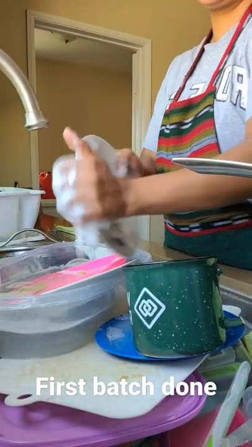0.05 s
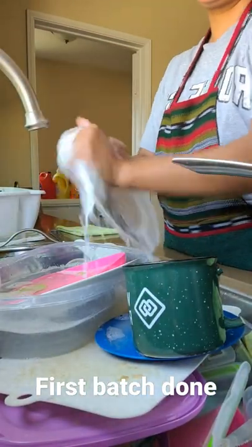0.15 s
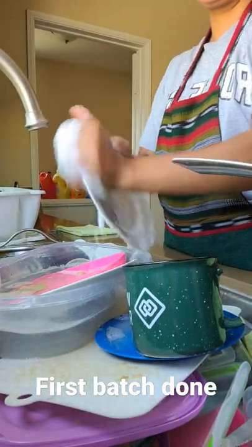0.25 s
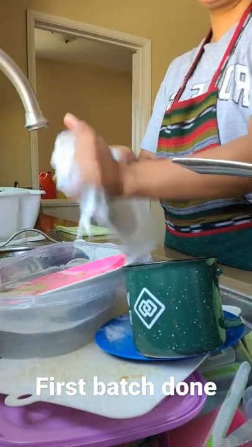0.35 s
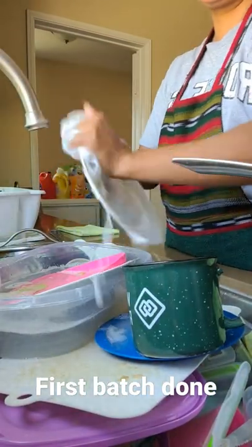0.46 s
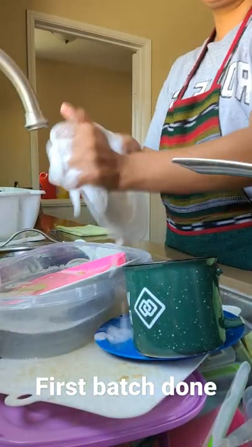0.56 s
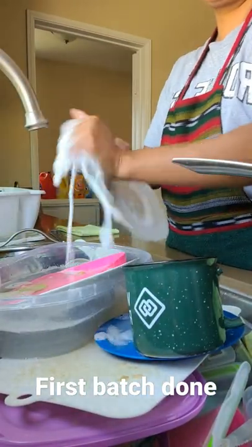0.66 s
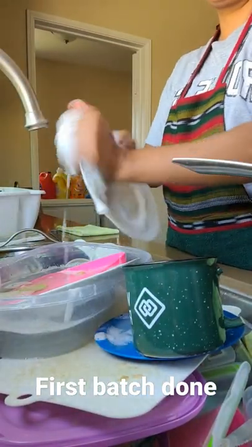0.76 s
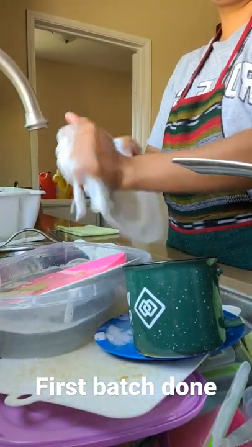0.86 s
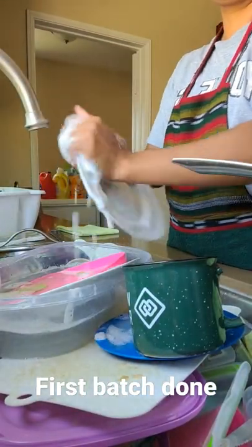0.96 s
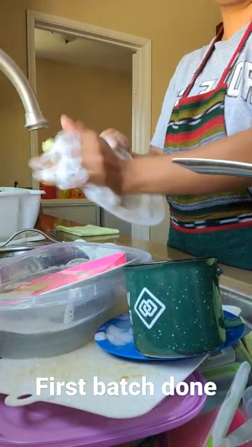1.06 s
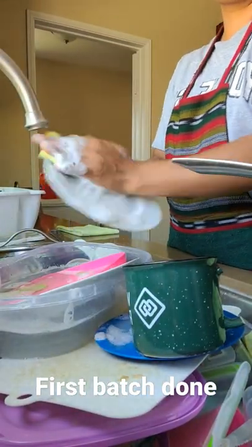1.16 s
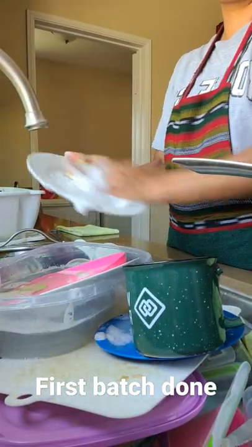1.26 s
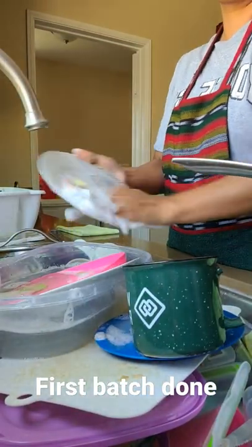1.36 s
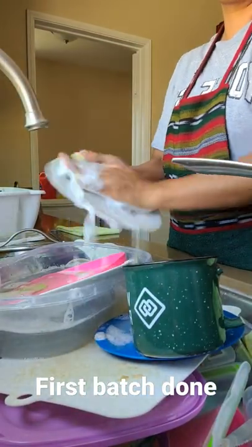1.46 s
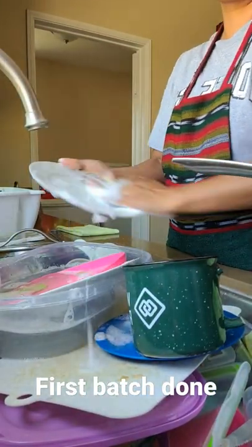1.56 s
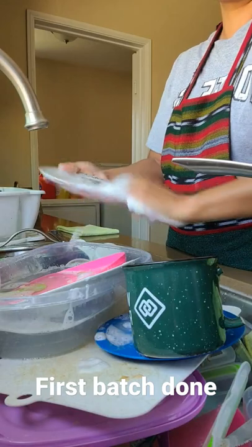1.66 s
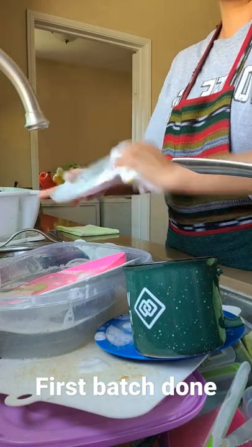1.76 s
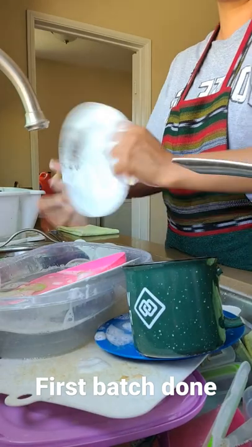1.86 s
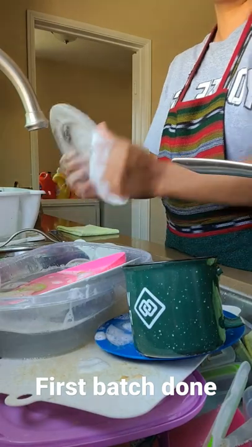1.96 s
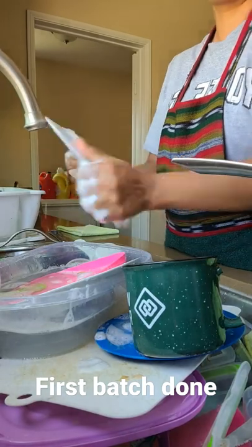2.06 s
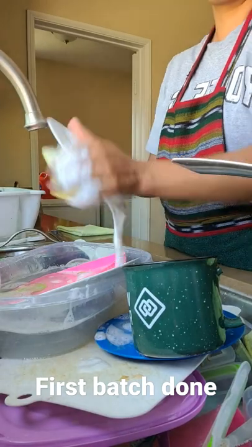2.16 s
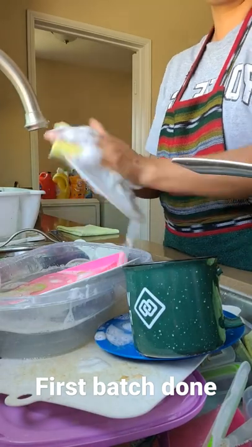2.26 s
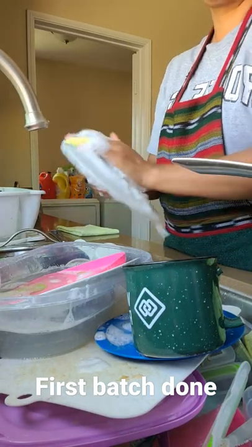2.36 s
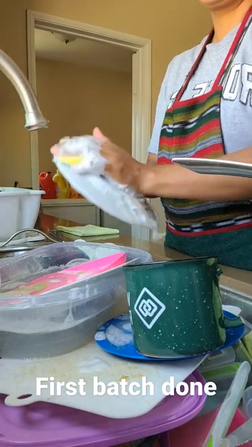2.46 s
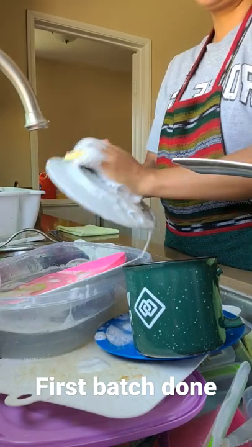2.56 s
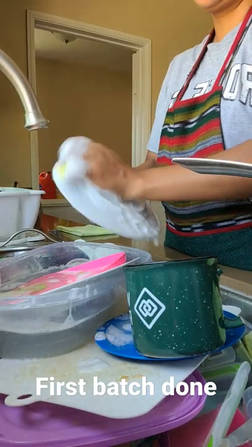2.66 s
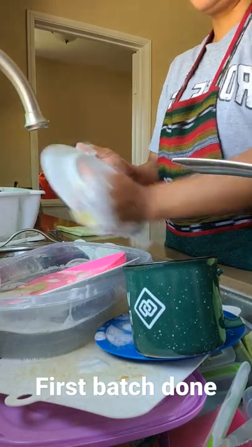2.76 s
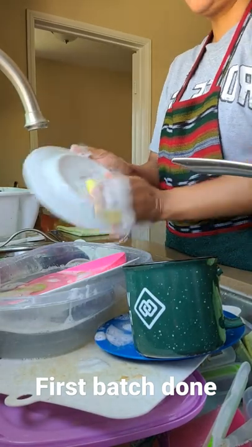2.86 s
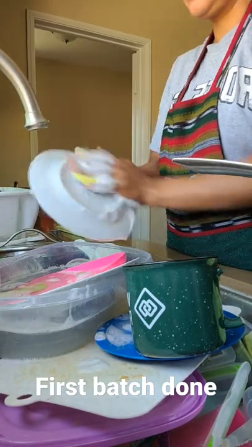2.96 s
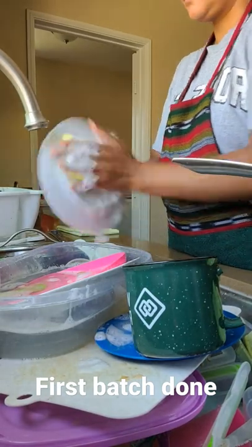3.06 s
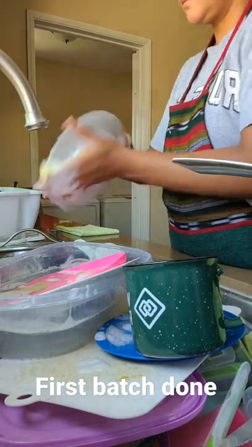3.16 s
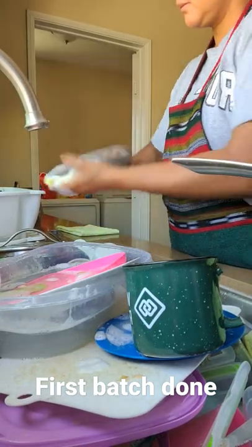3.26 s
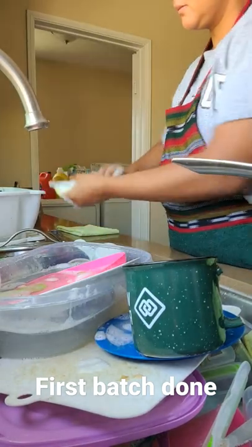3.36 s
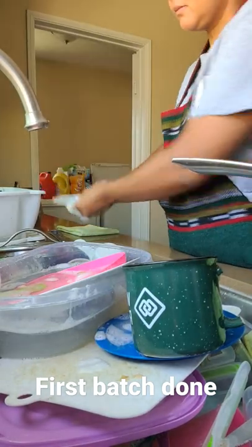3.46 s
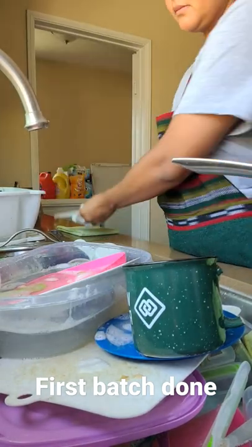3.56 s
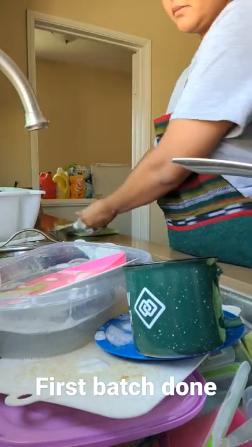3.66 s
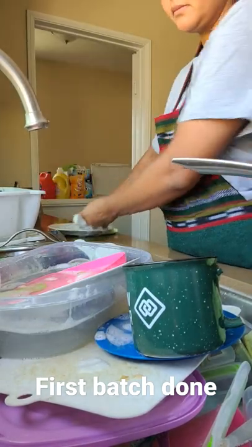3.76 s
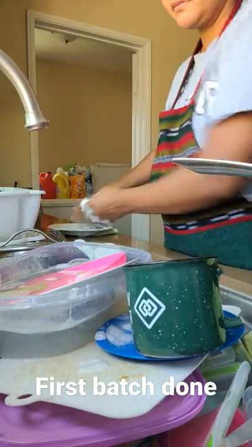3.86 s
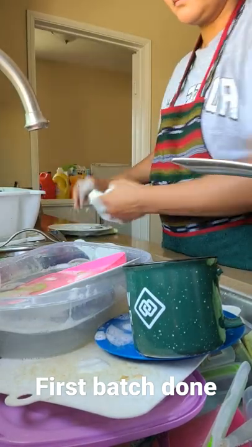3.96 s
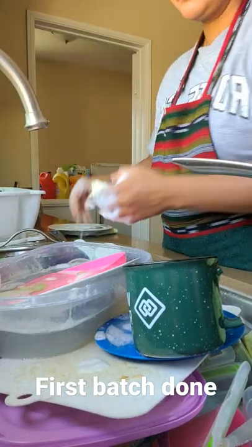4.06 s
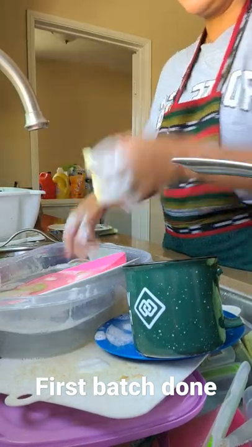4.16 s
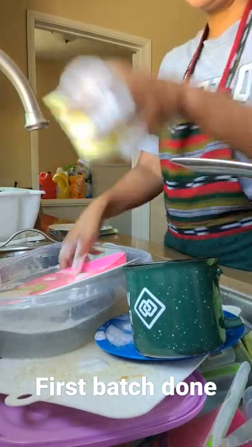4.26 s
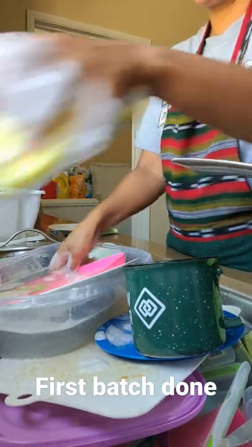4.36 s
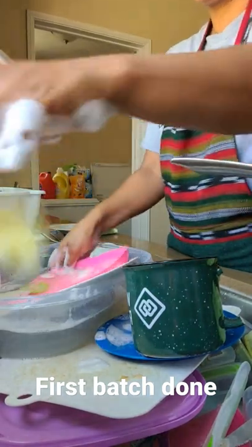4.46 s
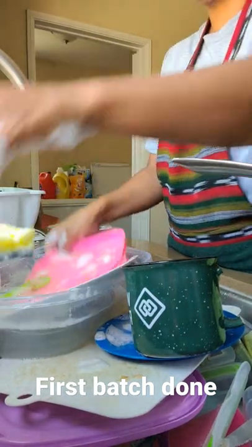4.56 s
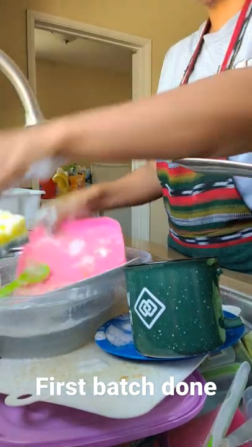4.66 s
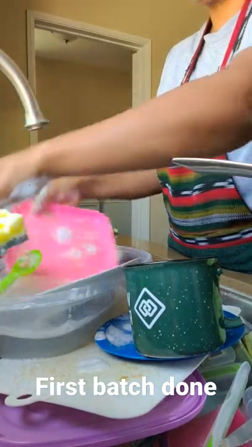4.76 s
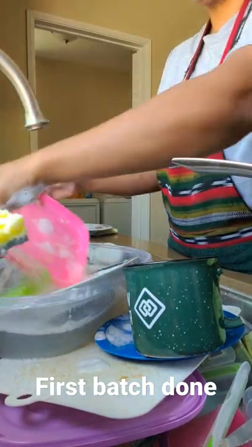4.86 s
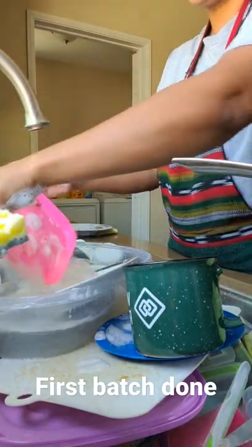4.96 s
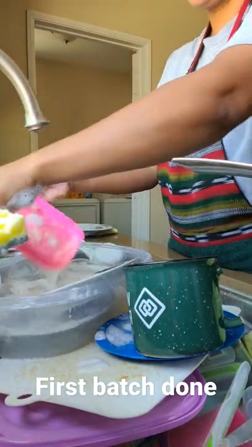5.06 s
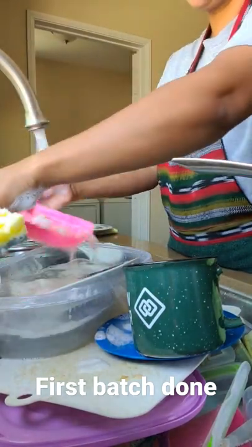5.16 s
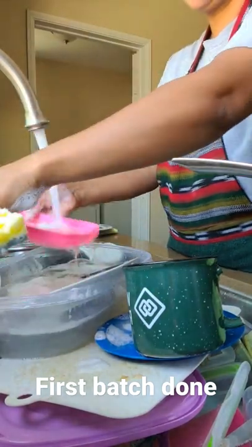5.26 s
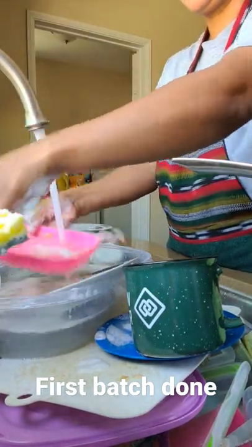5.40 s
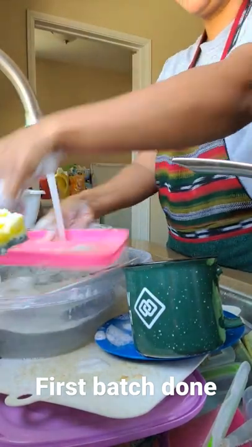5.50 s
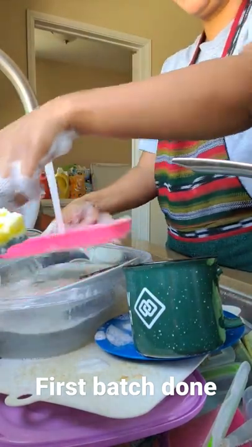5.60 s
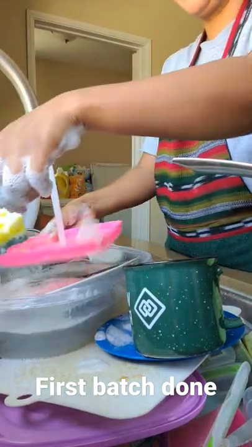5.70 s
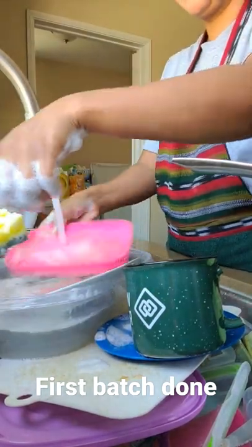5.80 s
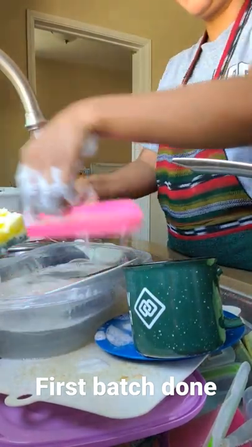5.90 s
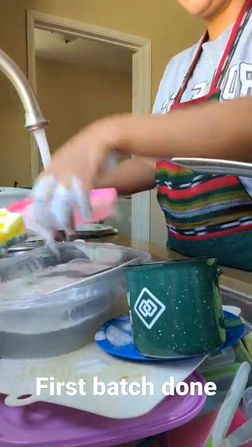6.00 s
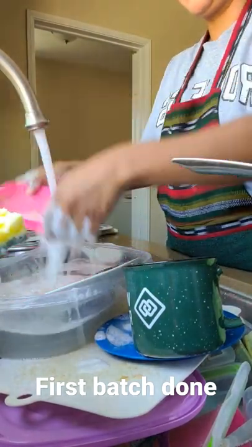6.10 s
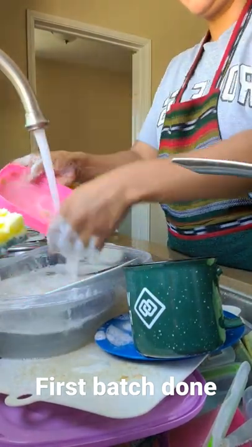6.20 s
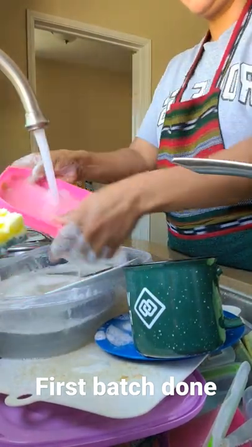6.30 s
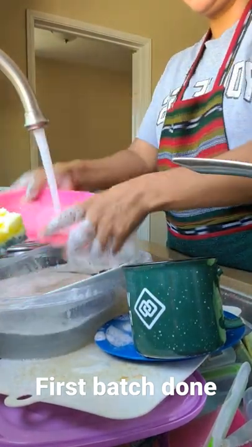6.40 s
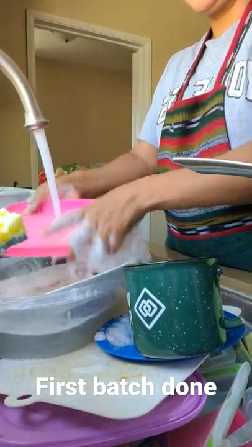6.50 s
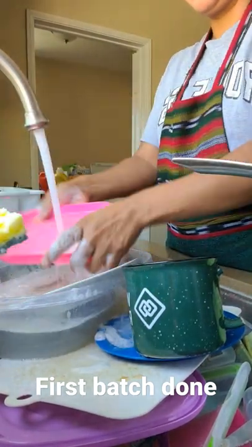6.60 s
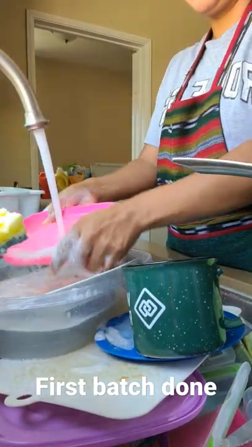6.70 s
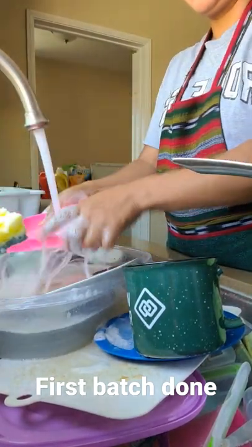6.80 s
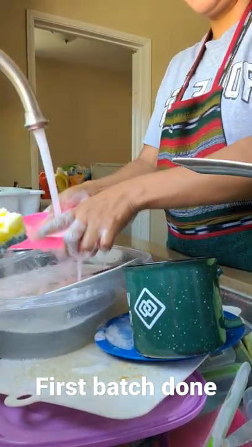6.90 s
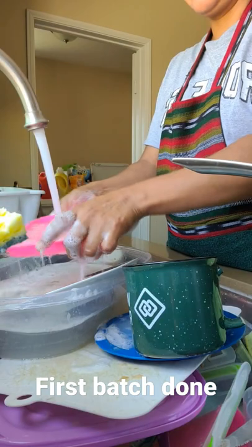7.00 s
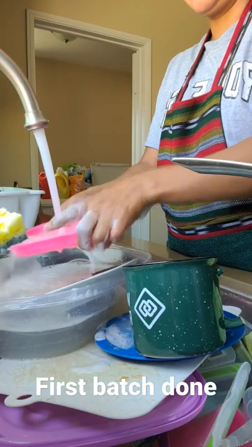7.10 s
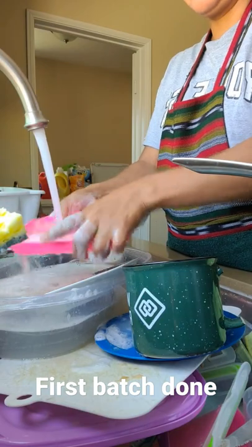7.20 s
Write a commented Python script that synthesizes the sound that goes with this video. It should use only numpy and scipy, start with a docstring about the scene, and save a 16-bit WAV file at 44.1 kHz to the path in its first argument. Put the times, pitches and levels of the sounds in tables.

```python
"""A soapy plate is scrubbed over a mains hum and a low drone, in a small, hard-walled kitchen. The plate squeaks,
knocks against an enamel pot and the spout, and is set down on the counter. A plastic tray is fished out of
a clattering tub of water and rinsed under the tap. Each knock is a burst of noise plus ringing tones;
suds and bubbles are built from random clicks, the tap from filtered noise, and the hum from wavering sines."""
import sys
import numpy as np
from scipy import signal
from scipy.fft import rfft, irfft, next_fast_len
from scipy.io import wavfile

SR = 44100
rng = np.random.default_rng(int(sys.argv[2]) if len(sys.argv) > 2 else 0)


def inscribe(sig):
    """Save sig as 16-bit PCM at rate SR to the path in sys.argv[1].

    A 1-D sig is mono; a 2-D sig holds one channel per row.
    Samples are clipped to [-1, 1] before scaling.
    """
    pcm = np.round(np.clip(np.atleast_2d(sig).T, -1, 1) * 32767)
    wavfile.write(sys.argv[1], SR, pcm.astype(np.int16))


N = 319284
TIME = np.arange(N) / SR   # seconds
BLOW_TIME = TIME[:SR * 3 // 4]   # seconds since one knock

# How alike the left and right sides are. Each row: pitch in Hz, correlation (1 is identical, 0 unrelated).
LEFT_RIGHT_LIKENESS = [(100, 0.92), (350, 1), (520, 0.1), (750, -0.37), (1400, 0.0076), (4000, 0.022)]


def from_db(db):
    """Turn decibels into a gain."""
    return 10 ** (np.asarray(db) / 20)


def rms_one(x):
    """Scale a sound so that its average strength (rms) is 1."""
    return x / np.sqrt(np.mean(x ** 2) + 1e-20)


def opening_one(x):
    """Scale a sound so that its first fiftieth of a second has rms 1."""
    return x / np.sqrt(np.mean(x[:, :SR // 50] ** 2))


def at_hz(points, hz):
    """Read a table between its rows, with pitch on a logarithmic scale."""
    table_hz, value = np.transpose(points)
    return np.interp(np.log(hz + 1), np.log(table_hz), value)


def drift(rate, size=N):
    """Smooth random wandering with spread 1, mostly slower than `rate` in Hz."""
    padded = next_fast_len(size)
    hz = np.fft.rfftfreq(padded, 1 / SR)
    noise = rfft(rng.standard_normal(padded))
    return rms_one(irfft(noise / (1 + (hz / rate) ** 4), padded)[:size])


def colour(x, spectrum):
    """Filter a sound to follow a spectrum and fall away below it, without sounding ahead of time."""
    size = 8192
    hz = np.fft.rfftfreq(size, 1 / SR)
    gain = from_db(at_hz(spectrum, hz)) / (1 + (spectrum[0][0] / (2 * hz + 1)) ** 2)
    # folding the cepstrum gives a minimum-phase filter: its response starts at once
    cepstrum = irfft(np.log(gain))
    cepstrum[1:size // 2] *= 2
    cepstrum[size // 2 + 1:] = 0
    response = irfft(np.exp(rfft(cepstrum)))
    return signal.fftconvolve(x, response[None], axes=-1)[:, :x.shape[-1]]


def resonate(x, hz, width):
    """One resonance, `width` Hz wide, with gain 1 on top."""
    r = np.exp(-np.pi * width / SR)
    feed = np.array([1, 0, -1]) * (1 - r * r) / 2
    feedback = [1, -2 * r * np.cos(2 * np.pi * hz / SR), r * r]
    return signal.lfilter(feed, feedback, x + 1e-18)


def diffuse(size):
    """White noise arriving from all sides: alike at both ears in the bass, nearly unrelated in the treble."""
    padded = next_fast_len(size)
    mid, side = rfft(rng.standard_normal((2, padded)))
    alike = np.clip(at_hz(LEFT_RIGHT_LIKENESS, np.fft.rfftfreq(padded, 1 / SR)), -.99, .99)
    both = np.sqrt(1 + alike) * mid + np.sqrt(1 - alike) * side * [[1], [-1]]
    return rms_one(irfft(both, padded)[:, :size])


def echoing_click(t60, direct_db, late_db=-29.0, late_t60=0.53, build_s=0.00028):
    """One click, then reflections from sink and walls crowd in and die away, with a faint long tail."""
    # t60 is the time in seconds to fade by 60 dB
    early = from_db(-60 * BLOW_TIME / t60)
    late = from_db(late_db - 60 * BLOW_TIME / late_t60)
    out = diffuse(len(BLOW_TIME)) * (early + late) * (1 - np.exp(-BLOW_TIME / build_s))
    out[[0, 1], [6, 0]] += from_db(direct_db)   # the click itself: left side 6 samples after the right
    return out


def kitchen(x, t60=0.25, direct_db=20.0):
    """Let a small source be heard through the echoes of the room; rms 1."""
    return rms_one(signal.fftconvolve(x[None], echoing_click(t60, direct_db), axes=-1)[:, :N])


def add(out, s, sound):
    """Mix a sound in at time s in seconds."""
    start = int(s * SR)
    out[:, start:start + sound.shape[1]] += sound[:, :N - start]


def grains(per_s, spread_db):
    """Clicks at random moments, a few much bigger than the rest."""
    sizes = from_db(spread_db * np.minimum(rng.exponential(1, N), 5))
    return sizes * rng.choice([-1, 1], N) * (rng.random(N) < per_s / SR)


def swell(s, length):
    """One movement: builds to 1 at time s and eases off again."""
    rise_share = 0.48   # part of the length spent swelling
    side_length = length * np.where(TIME < s, rise_share, 1 - rise_share)
    reach = np.abs(TIME - s) / side_length
    return np.exp(-np.minimum(reach, 10) ** 2)


def effort(movements, rest_db):
    """Gain of a run of strokes or splashes; their powers add over a resting level."""
    power = from_db(rest_db) ** 2
    for s, length, db in movements:
        power = power + (from_db(db) * swell(s, length)) ** 2
    return np.sqrt(power)


def room(drone_db=-45.5, air_db=-69.0, usual_db=1.5, swing=0.83):
    """A motor's wavering mains hum over a low drone of moving air, with a faint steady hiss."""
    # Ups and downs of hum and drone; only differences from the average count.
    # Each row: time in seconds, level in dB.
    background = [(0.0, -39), (1.11, -44.5), (1.91, -38.5), (2.54, -47), (4.72, -42), (5.36, -37.5),
                  (6.92, -41), (7.24, -39)]
    # Colour of the drone. Each row: pitch in Hz, relative strength in dB.
    drone_spectrum = [(12, -41), (20, -6), (65, -7.5), (90, -11), (103, -16), (123, -12.5), (147, -9.5),
                      (188, -13.5), (318, -17), (357, -5), (511, -20.5), (546, -14.5), (664, -24),
                      (1000, -28), (1300, -29.5), (2200, -120)]
    # Tones of the hum. Each row: pitch in Hz, level in dB before the ups and downs, waver from 0 to 1.
    hum_tones = [(120.1, -47, 0.06), (355.4, -53.5, 0.86)]
    level_db = np.interp(TIME, *np.transpose(background))
    hum = 0
    for hz, db, waver in hum_tones:
        strength = 1 + waver * drift(13)
        tone = strength * np.sin(2 * np.pi * hz * TIME + waver * drift(15.5))
        hum = hum + from_db(db) * rms_one(tone)
    drone = from_db(drone_db) * rms_one(colour(diffuse(N), drone_spectrum))
    ups_and_downs = from_db(usual_db + swing * (level_db - level_db.mean()))
    return ups_and_downs * (hum + drone) + from_db(air_db) * diffuse(N)


def taps(direct_db=18.0):
    """Light touches of fingers and plastic and plops of water and suds, each with one damped resonance."""
    # Each row: start in seconds, level in dB, centre pitch in Hz, sharpness Q, fade time t60 in seconds.
    touches = [(0.097, -43, 1660, 3.5, 0.074), (0.567, -45.5, 1980, 5.2, 0.046), (1.036, -29, 850, 6, 0.12),
               (1.036, -37, 3300, 1.3, 0.15), (1.459, -47, 2060, 5.6, 0.073),
               (1.515, -49, 2600, 0.44, 0.061), (1.94, -46, 5000, 0.34, 0.11), (2.28, -48, 1680, 1.3, .12),
               (2.5705, -43, 2180, 0.4, 0.026), (3.066, -42.5, 1800, .8, 0.11),
               (4.106, -43, 330, 2.1, 0.083), (4.456, -36, 525, 1.2, 0.14), (4.835, -44, 700, 0.24, 0.11),
               (4.887, -35, 335, 4.2, 0.13), (4.898, -44, 490, 10, 0.091),
               (4.9485, -41.5, 5950, 0.67, 0.17), (4.996, -38.5, 360, 2.8, 0.15),
               (6.905, -38.5, 667, 15, 0.054)]
    out = np.zeros((2, N))
    for s, level_db, hz, q, t60 in touches:
        ringing = resonate(echoing_click(t60, direct_db), hz, hz / q)
        body = resonate(ringing, hz, 2 * hz)
        add(out, s, from_db(level_db) * opening_one(body))
    return out


def slosh(pressure, flow, low_hz=1100, high_hz=3500, q=5.7):
    """Bubbles of many sizes ring briefly in the tub, stirred by splashes, the sponge's run-off and the jet."""
    # Splashes into the tub. Each row: fullest moment in seconds, length in seconds, bubble level in dB.
    splashes = [(0.04, 0.11, -44.5), (4.46, 0.1, -49), (4.7, 0.11, -47), (5.03, 0.12, -42.5),
                (5.54, 0.15, -40), (6.16, .08, -41)]
    splashing = effort(splashes, rest_db=-58.5)   # at rest: the tub left alone
    run_off = from_db(-11.5) * pressure   # water squeezed from the sponge
    jet = from_db(-16) * flow
    stir = np.sqrt(splashing ** 2 + run_off ** 2 + jet ** 2)
    rings = 0
    for hz in np.geomspace(low_hz, high_hz, 20):
        bubbles = resonate(grains(per_s=40, spread_db=3.5), hz, hz / q)
        rings = rings + bubbles / np.sqrt(hz)
    return stir * kitchen(rings)


def tap_flow():
    """Gain of the jet: the valve opens quickly, then the first surge settles to a steady stream."""
    half_open_s, opening_s = 5.143, 0.014
    steady_db, surge_db, surge_s = -31.0, 1.6, 0.6
    since = TIME - half_open_s
    valve = (1 + np.tanh(since / (2 * opening_s))) / 2
    return valve * from_db(steady_db + surge_db * np.exp(-(since / surge_s) ** 2))


def running_tap(flow, spray_db=1.5, drops_db=-2.5, flutter_db=0.4):
    """The aerated jet hisses, spatters on the tray and drums the basin's resonances."""
    # Colour of the spray. Each row: pitch in Hz, relative strength in dB.
    spray_spectrum = [(530, -19), (900, -29), (1160, -24), (1550, -6), (1790, -10), (2020, -14),
                      (2570, -13), (3300, 0.5), (4150, -9), (5610, -0.5), (8980, -2), (10500, 3),
                      (13500, -4), (14900, 1), (16000, -7.5)]
    # Basin resonances drummed by the jet. Each row: pitch in Hz, width in Hz, level in dB relative to the jet's gain.
    basin_modes = [(184, 14, -22), (350.4, 74, -11.5), (457, 7.2, -24.5), (607, 42, -24), (820, 390, -26.5),
                   (1398, 52, -24.5), (1565, 90, -24), (1960, 360, -13.5), (2750, 19, -22),
                   (3810, 200, -14.5), (10500, 2700, -17.5)]
    flutter = from_db(flutter_db * drift(19))
    drops = kitchen(grains(per_s=5000, spread_db=6.5))
    spray = rms_one(colour(diffuse(N) + from_db(drops_db) * drops, spray_spectrum))
    jet = diffuse(N)
    basin = sum(from_db(db) * rms_one(resonate(jet, hz, width)) for hz, width, db in basin_modes)
    return flow * flutter * (from_db(spray_db) * spray + basin)


def squeak(jitter=0.033):
    """A finger sticks and slips on the wet plate, giving a jittery tone that rises with the press."""
    # Each row: multiple of the slip rate, relative level in dB.
    partials = [(2, -1), (3, -7.5)]
    slip_hz, slip_rise_hz = 523, 37.3
    press = swell(s=0.2, length=0.169)
    rate = (slip_hz + slip_rise_hz * press) * (1 + jitter * drift(80))
    phase = 2 * np.pi * np.cumsum(rate) / SR
    tone = sum(from_db(db) * np.sin(round(k) * phase) for k, db in partials)
    return from_db(-43) * press * kitchen(tone)


def scrubbing_pressure():
    """How hard the foam is pressed, as a gain; between strokes the suds crackle on their own."""
    # Strokes of sponge or hand. Each row: firmest moment in seconds, length in seconds, pressure in dB.
    strokes = [(0.04, 0.18, -54), (.25, 0.24, -47.5), (.48, 0.18, -51.5), (.76, .12, -52.5),
               (.975, 0.072, -43), (1.11, 0.26, -45.5), (1.46, 0.37, -49), (1.66, 0.24, -48.5),
               (1.86, 0.16, -37.5), (2.24, 0.19, -44.5), (2.505, 0.045, -47.5), (2.64, 0.15, -52),
               (2.84, 0.19, -45.5), (3.04, 0.32, -43.5), (3.33, 0.08, -44), (4.11, 0.051, -51.5),
               (4.4, 0.29, -50.5), (4.88, 0.05, -46.5), (5.0, 0.29, -42)]
    return effort(strokes, rest_db=-57.5)


def sponge(pressure, level_db=-3.5, uneven_db=0.5):
    """Foam bursts in countless tiny pops as the sponge is pressed along."""
    # Colour of the foam. Each row: pitch in Hz, relative strength in dB.
    foam_spectrum = [(450, -36), (700, -6), (1150, -10.5), (1500, -5), (2000, 2.5), (2550, -11.5),
                     (3000, -3), (4500, -9), (6000, -6.5), (8500, -14.5), (10000, -9.5), (15000, -24.5)]
    pops = kitchen(grains(per_s=4100, spread_db=7.0))
    unevenness = from_db(level_db + uneven_db * drift(33))
    return pressure * unevenness * rms_one(colour(pops, foam_spectrum))


# The things below use three kinds of table.
# Blows, each row: start in seconds, level in dB, ring in dB relative to that level, fade time t60 in seconds.
# Modes (ringing tones), each row: pitch in Hz, relative level in dB, t60 in seconds when the blow's own is 0.22.
# Crack (dense, short-lived resonances), each row: pitch in Hz, relative strength in dB.
def dish(blows, modes, crack, direct_db, rough, free_t60=0.22):
    """Each blow gives a broad crack and sets the modes ringing; a firm grip shortens both."""
    out, size = np.zeros((2, N)), len(BLOW_TIME)
    for s, level_db, ring_db, t60 in blows:
        sound = opening_one(colour(echoing_click(t60, direct_db), crack))
        for hz, mode_db, mode_t60 in modes:
            # the less alike the sides are at this pitch, the further out of step the mode reaches them
            apart = np.arccos(np.clip(at_hz(LEFT_RIGHT_LIKENESS, hz), -1, 1)) * rng.choice([-1, 1])
            phase = 2 * np.pi * (hz * BLOW_TIME + rng.random()) + np.array([[0], [apart]])
            # reflections beat against the ring, differently on each side
            beat, sway = rough * drift(63, size=4 * size).reshape(2, 2, size)
            ring = ((1 + beat) * np.sin(phase) + sway * np.cos(phase)) / np.hypot(1, rough)
            fade_db = -60 * BLOW_TIME / mode_t60 * free_t60 / t60
            sound += from_db(ring_db + mode_db + fade_db) * ring
        add(out, s, from_db(level_db) * sound)
    return out


def tub():
    """Knocks in the clattering tub excite its crack and its roughly beating modes."""
    # Blows, modes and crack of the tub, columns as listed above dish().
    blows, modes, crack = [(4.439, -36.5, -11, .12), (4.46, -32.5, -10, 0.052), (4.475, -42, -11, 0.039),
                           (4.567, -63, 5, 0.14), (4.643, -49.5, 6, 0.21), (4.653, -44, 3.5, .16),
                           (4.686, -50, 4.5, 0.21), (4.735, -53, 1, 0.2), (4.996, -43.5, 2.5, 0.096),
                           (5.03, -48, -5, 0.17)], [(763, -9, 0.15), (1314, 4, 0.21), (1950, 6.5, 0.23),
                                              (2190, 2, 0.23), (2790, -5, .15), (3360, -10, 0.11)], [(600, 4), (1300, -12), (1650, -10),
                                                                 (2000, 0.5), (2900, -1.5), (4200, -14),
                                                                 (10000, -21.5), (15000, -28)]
    return dish(blows, modes, crack, direct_db=12.0, rough=1.5)


def tray():
    """Two close knocks make the plastic tray crack and ring."""
    # Blows, modes and crack of the tray, columns as listed above dish().
    blows, modes, crack = [(5.7475, -22.5, 1.5, 0.052), (5.757, -21.5, -0.5, 0.13)], [(510, 7, 0.071), (587, 0.5, 0.12), (879, -1.5, 0.22),
                                               (1280, -5, 0.43), (1920, 1, 0.18), (2770, -4.5, .25)], [(120, -6), (300, -10.5), (550, 3.5),
                                                                   (700, -4.5), (1200, -7), (1700, -8),
                                                                   (3000, -13.5), (5000, -15.5),
                                                                   (12000, -25)]
    return dish(blows, modes, crack, direct_db=18.0, rough=1.0)


def counter():
    """The plate is set down in two close blows, with a crack and ringing modes."""
    # Blows, modes and crack of plate on counter, columns as listed above dish().
    blows, modes, crack = [(3.6465, -18, -3.5, 0.28), (3.6575, -17.5, -2.5, 0.26)], [(327, -2, 0.13), (505, 7.5, 0.068), (1290, 6, 0.097),
                                                  (1414, -6, 0.25), (1940, -3, 0.27), (2490, 2.5, 0.24),
                                                  (2490, -10, 0.16), (2960, -6, 0.18), (3270, -11, 0.26),
                                                  (3720, -7.5, 0.3), (5170, -13.5, 0.32), (5840, -14, 0.3),
                                                  (6470, -10.5, 0.28)], [(90, -14), (165, 0), (235, -10.5),
                                                                         (335, -5), (520, -11),
                                                                         (800, -13.5), (1350, -10.5),
                                                                         (2050, -15.5), (2470, -4.5),
                                                                         (2750, -19), (3900, -10.5),
                                                                         (4650, -23), (5400, -18.5),
                                                                         (8400, -25.5), (10000, -20.5),
                                                                         (15500, -42)]
    return dish(blows, modes, crack, direct_db=19.0, rough=1.0)


def spout():
    """The plate hits the spout in a quick run of blows, each with a crack and ringing modes."""
    # Blows, modes and crack of plate on spout, columns as listed above dish().
    blows, modes, crack = [(1.9992, -19.5, -3.5, 0.28), (2.012, -17, -11, 0.3), (2.033, -21, -18, 0.23),
                           (2.107, -33, -4.5, 0.19)], [(373, -6, 0.47), (666, 1.5, 0.23), (1443, 0.5, 0.29),
                                                (1550, 5, 0.056), (1810, 6, 0.098), (1710, 4.5, 0.16),
                                                (1995, 6, 0.088), (2250, 0, 0.16), (2520, -3.5, 0.24),
                                                (3710, -4.5, 0.29), (3900, -8, 0.31), (4020, -5, 0.22),
                                                (5430, -7, 0.24), (6750, 0, 0.16)], [(100, -11), (240, -13.5), (400, 1),
                                                                     (550, -9), (662, -18), (780, -18),
                                                                     (1180, -15), (1480, -9), (3860, -14.5),
                                                                     (4870, -19), (5190, -15.5),
                                                                     (8640, -22), (10000, -17),
                                                                     (16000, -39)]
    return dish(blows, modes, crack, direct_db=19.5, rough=1.0)


def pot():
    """One knock of the plate sets the enamel pot's modes ringing after a crack."""
    # Blow, modes and crack of plate on pot, columns as listed above dish().
    blows, modes, crack = [(0.2893, -15, -6, 0.22)], [(580, 2.5, 0.23), (921, 7, 0.13), (1434, 1, 0.15),
                                              (1407, -2.5, 0.24), (1930, 0, 0.35), (2000, -1, 0.37),
                                              (2170, 5.5, 0.22), (2235, -9, 0.3), (2750, 2, 0.23),
                                              (3300, -9, 0.23), (3820, -11, 0.34)], [(59, -48), (100, -12.5), (583, -4.5),
                                                                 (854, -12), (930, -6.5), (1420, -3.5),
                                                                 (1680, -13), (2130, -0.5), (2470, -22),
                                                                 (2750, -10.5), (4670, -21), (10200, -26),
                                                                 (16000, -41)]
    return dish(blows, modes, crack, direct_db=10.0, rough=0.73)


def scene():
    """Room, water and dishes together."""
    pressure, flow = scrubbing_pressure(), tap_flow()
    water = slosh(pressure, flow) + running_tap(flow) + sponge(pressure)
    knocks = tub() + tray() + counter() + spout() + pot()
    return room() + taps() + water + squeak() + knocks


def record(dry):
    """Balance the two sides, mostly towards the right, round the loudest peaks and cut the top."""
    # Each row: pitch in Hz, left minus right in dB.
    balance = [(60, -0.5), (120, -2.5), (350, -5), (750, -6), (1400, -3.5), (2600, -6), (5500, -5),
               (8000, 1), (10300, -12.5), (12500, 2), (15000, -1)]
    lean_db = at_hz(balance, np.fft.rfftfreq(N, 1 / SR))
    ports = irfft(rfft(dry) * from_db(np.array([lean_db, -lean_db]) / 2), N)
    cutoff_hz = 15600
    lowpass = signal.ellip(12, .1, 80, cutoff_hz, fs=SR, output="sos")
    return signal.sosfilt(lowpass, np.tanh(ports))


dry = scene()
out = record(dry)
inscribe(out)
```